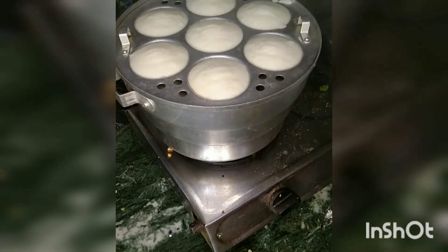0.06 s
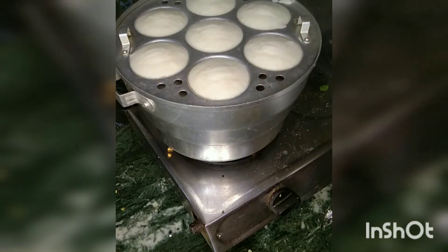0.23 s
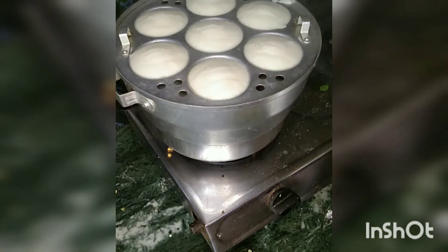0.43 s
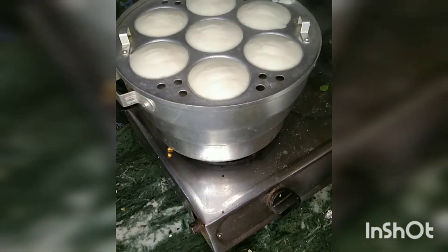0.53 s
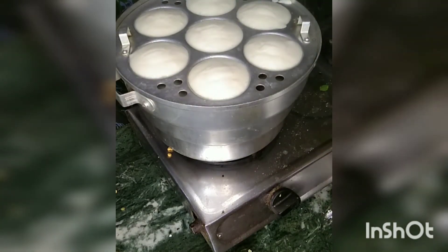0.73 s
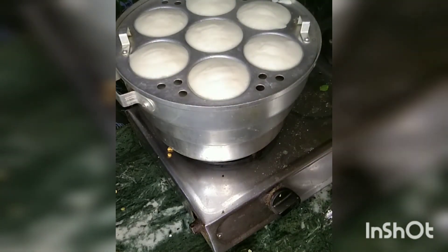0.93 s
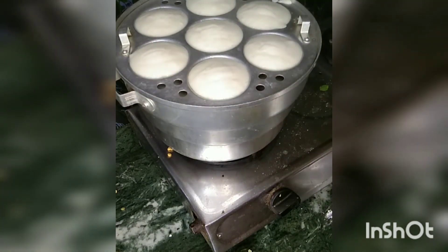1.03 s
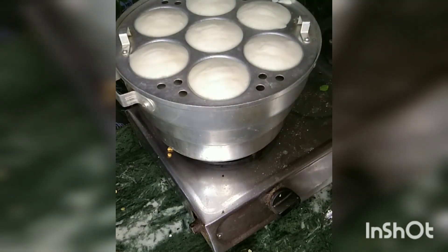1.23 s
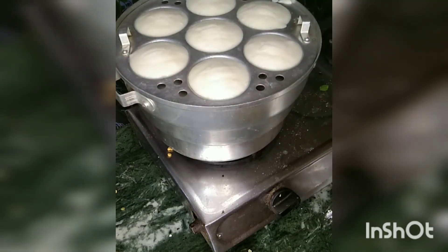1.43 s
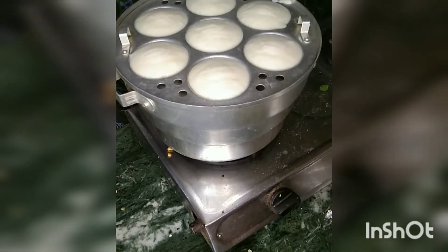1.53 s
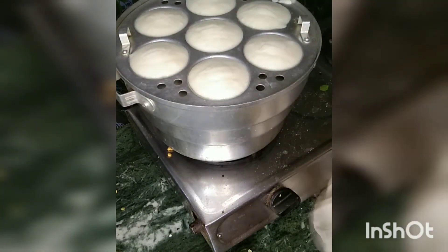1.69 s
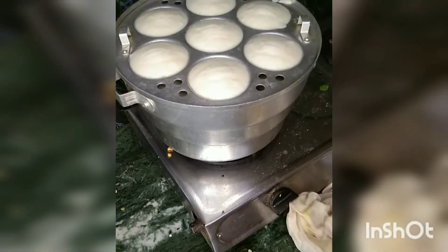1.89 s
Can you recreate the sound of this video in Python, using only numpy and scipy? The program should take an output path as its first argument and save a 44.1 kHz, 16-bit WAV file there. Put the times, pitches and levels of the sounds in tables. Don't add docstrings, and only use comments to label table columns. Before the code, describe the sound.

Metal cookware clattering in a home kitchen: ringing lid blows, a settling rattle, two tray knocks

```python
import sys
import numpy as np
from scipy import signal
from scipy.fft import rfft, irfft
from scipy.io import wavfile
from scipy.ndimage import uniform_filter1d

SR = 44100
rng = np.random.default_rng(int(sys.argv[2]) if len(sys.argv) > 2 else 0)


def to_linear_factor(level_db):
    exponent = np.asarray(level_db, float) / 20
    return 10 ** exponent


def inscribe(sig):
    pcm = np.round(np.clip(np.atleast_2d(sig).T, -1, 1) * 32767)
    wavfile.write(sys.argv[1], SR, pcm.astype(np.int16))


N = 85995

# start in seconds, rattle level in dB, rattle hold and 60 dB fade in seconds.
LID_BLOWS = [
    (0.2419, -17.5, 0.077, 0.14),
    (0.8686, -21, 0.074, 0.075),
]
# start in seconds, rattle in dB, hold and 60 dB fade in seconds.
CROWN_BLOWS = [
    (0.35, -16, 0.037, 0.29),
    (0.393, -21, 0.054, 0.23),
]
# start in seconds, rattle in dB, hold and 60 dB fade in seconds.
SETTLES = [
    (0.948, -21, .03, 0.13),
    (1.0215, -24.5, .01, 0.3),
]
# start in seconds, rattle in dB, hold and 60 dB fade in seconds.
TRAY_BLOWS = [
    (1.106, -21.5, 0.038, 0.11),
    (1.174, -33.5, 0.018, 0.16),
    (1.2461, -21.5, 0.0095, 0.22),
]
LID_HZ = [689, 974, 1428, 2212, 2776, 2870, 3135, 3409, 3550, 4156, 4962, 5504, 5805, 6598]
WALL_HZ = [230, 170, 482, 565, 3878, 4400, 4657, 6095, 7440, 8135, 8872, 9575, 10265]
TRAY_HZ = [392, 480, 775, 1025, 1085, 1529, 1615, 2272, 2471, 3136, 3650, 3994, 4580]


def evened(x):
    return x / np.sqrt(np.mean(x ** 2) + 1e-20)


def read(points, hz):
    f, value = np.transpose(points)
    return np.interp(np.log(hz + 1), np.log(f + 1), value)


def add(mix, s, sound):
    part = mix[round(s * SR):][:len(sound)]
    part += sound[:len(part)]


def decay(t, t60):
    return to_linear_factor(-60 * np.maximum(t, 0) / t60)


def onset(t, rise):
    return np.sin(np.pi / 2 * np.clip(t / rise, 0, 1)) ** 2


def slow(length):
    smooth = uniform_filter1d(rng.standard_normal(length), size=600)
    return evened(uniform_filter1d(smooth, size=600))


def wobble(length, db):
    return to_linear_factor(db * slow(length))


def shaped(gain):
    return evened(irfft(rfft(rng.standard_normal(N)) * gain, N))


def ring(modes, t, drift=0):
    out = 0
    for hz, t60, db in modes:
        wave = np.sin(2 * np.pi * (hz * t + drift + rng.random()))
        out = out + to_linear_factor(db) * np.sqrt(2) * decay(t, t60) * wave
    return out


def sheet(colour, clear_hz, count=500):
    clear_db, clear_t60, crowd_t60, spread_db = 11, 0.037, 0.086, 3.5
    t = np.arange(6000) / SR
    hz = np.geomspace(120, 15800, count) * rng.uniform(.99, 1.01, count)
    scatter_db = spread_db * rng.standard_normal(count) * np.minimum(hz / 3000, 1)
    size = to_linear_factor(read(colour, hz) + scatter_db) * np.sqrt(hz) * rng.choice([-1, 1], count)
    crowd = size @ np.sin(2 * np.pi * hz[:, None] * t) * decay(t, crowd_t60)
    clear = [(f, clear_t60, clear_db + read(colour, f) + 10 * np.log10(f)) for f in clear_hz if f > 900]
    out = (crowd + ring(clear, t)) * onset(t, 0.00034)
    return out / np.linalg.norm(out)


def clatter(blows, colour, clear_hz, crack_db):
    ticks_per_s, tick_spread_db, crack_t60 = 2500, 5.5, 0.012
    ticks, t = np.zeros(N), np.arange(SR // 2) / SR
    for s, db, hold, fade in blows:
        chance, side, size = rng.random((3, len(t)))
        shower = (chance < ticks_per_s / SR) * np.sign(side - .5)
        shower = shower * to_linear_factor(-tick_spread_db * np.log(size + 0.026))
        strength = decay(t - hold, fade) + to_linear_factor(crack_db) * decay(t, crack_t60)
        add(ticks, s, to_linear_factor(db) * evened(shower) * strength)
    return signal.oaconvolve(ticks, sheet(colour, clear_hz))[:N]


def lid_clatter():
    # frequency in Hz, level in dB per Hz.
    rim_colour = [(150, -34.5), (480, -0.5), (1000, 1), (1750, -11), (2300, -26), (2750, -6.5), (6000, -12),
                  (15500, -59.5)]
    # frequency in Hz, level in dB per Hz.
    crown_colour = [(150, -33.5), (300, -18.5), (500, -3), (1000, -1.5), (2000, -19.5), (3200, -7),
                    (6000, -12), (10000, -30.5), (15500, -45.5)]
    # frequency in Hz, level in dB per Hz.
    settle_colour = [(71, -46), (120, -19), (221, -15), (432, -2), (1300, -7.5), (1460, -7.5), (2590, -15),
                     (4860, -15.5), (15500, -62)]
    rim = clatter(LID_BLOWS, rim_colour, LID_HZ + WALL_HZ, crack_db=14.5)
    crown = clatter(CROWN_BLOWS, crown_colour, LID_HZ, crack_db=0)
    return rim + crown + clatter(SETTLES, settle_colour, LID_HZ[4::2], crack_db=-1)


def lid_ring():
    # t60 in seconds, level in dB on the rim,
    # the crown, letting go, the rim again.
    lid_modes = [(2.5, -35.5, -54.5, -40, -34), (0.53, -24, -28, -58.5, -54), (1.21, -24.5, -49, -20, -27),
                 (0.59, -39, -25.5, -36.5, -58), (0.36, -45, -36, -16.5, -50.5),
                 (0.62, -24, -29, -30, -21.5), (0.31, -22, -38.5, -43, -30.5), (0.38, -54, -44.5, -26, -41),
                 (0.45, -38.5, -35, -27.5, -42.5), (0.6, -37.5, -27, -31, -32),
                 (0.1, -33, -26.5, -46.5, -21), (0.47, -45, -51.5, -52.5, -44.5),
                 (0.071, -20.5, -18, -41.5, -14.5), (0.13, -39, -28, -46.5, -18.5),
                 (0.36, -42.5, -56.5, -36.5, -57), (0.3, -51.5, -55.5, -54.5, -69),
                  (0.62, -28, -31.5, -42.5, -25.5), (0.54, -26.5, -41.5, -42.5, -23),
                  (.15, -22.5, -38, -49.5, -24.5), (0.78, -23.5, -57, -50.5, -29.5),
                  (.27, -35, -46, -53.5, -50.5), (0.15, -45, -39.5, -58, -30.5),
                  (0.19, -46, -29.5, -48.5, -30), (0.41, -53, -39.5, -64.5, -51),
                  (0.33, -55.5, -42.5, -60, -44.5), (0.49, -52.5, -65, -66, -52.5),
                  (.25, -60, -45.5, -67, -46.5)]
    # start in seconds, rise in seconds, choked at seconds.
    rings = [
        (.243, 0.0068, 0.31),
        (.352, 0.0018, .868),
        (.405, .03, .868),
        (.869, .003, .948),
    ]
    choke_t60, wobble_db, drift_turns = .11, 2, .07
    steady_hz = LID_HZ[:3:2]
    out, t = np.zeros(N), np.arange(3 * SR // 4) / SR
    for k, (s, rise, choke) in enumerate(rings):
        for hz, m in zip(LID_HZ + WALL_HZ, lid_modes):
            shape = onset(t, rise) * decay(t + s - choke, choke_t60)
            shape = shape * wobble(len(t), wobble_db * (m[0] < .8))
            drift = drift_turns * (hz not in steady_hz) * slow(len(t))
            add(out, s, shape * ring([(hz, m[0], m[1 + k])], t, drift))
    return out


def tray_clatter():
    # frequency in Hz, level in dB per Hz.
    tray_colour = [(150, -41), (260, -11), (420, -3.5), (1500, -15.5), (2000, -24.5), (2500, -19),
                   (5500, -20.5), (15500, -65.5)]
    return clatter(TRAY_BLOWS, tray_colour, TRAY_HZ[:7], crack_db=6)


def tray_ring():
    # t60 in seconds, level in dB at the first knock, at the second knock.
    tray_modes = [(0.19, -18, -32), (0.045, -60, -40), (0.35, -37, -41.5), (0.096, -37, -31),
                  (0.21, -26, -31), (0.32, -28.5, -32.5), (0.35, -25, -64), (0.32, -34, -39),
                  (0.083, -28, -57), (0.5, -33.5, -54), (0.3, -37, -53), (0.1, -48, -31), (0.35, -63, -48)]
    wobble_db, drift_turns = 4, .2
    out, t = np.zeros(N), np.arange(SR // 2) / SR
    for k, blow in enumerate(TRAY_BLOWS[::2]):
        for hz, m in zip(TRAY_HZ, tray_modes):
            shape = onset(t, 0.0025) * wobble(len(t), wobble_db)
            add(out, blow[0], shape * ring([(hz, m[0], m[1 + k])], t, drift_turns * slow(len(t))))
    return out


def thumps():
    # start in seconds, pitch in Hz, level in dB, t60 in seconds.
    air_thumps = [(0.2432, 485, -2, 0.03), (0.353, 510, -5, 0.035), (.869, 510, -3, 0.04),
                  (1.2465, 495, -4, 0.035), (.950, 640, -5, 0.019), (.261, 700, -9, 0.03),
                  (.285, 750, -13, .03), (.304, 950, -14, .03), (.41, 500, -15, .04),
                  (0.887, 520, -8, 0.024), (.906, 490, -11, .03), (0.963, 300.5, -26, 0.12),
                  (1.022, 433, -19, .03), (1.086, 520, -22, .03), (1.1052, 442, -2, 0.026),
                  (1.122, 421, -7, 0.033), (1.136, 450, -13, .03), (1.264, 465, -10, 0.025)]
    out, t = np.zeros(N), np.arange(SR // 4) / SR
    for s, hz, db, t60 in air_thumps:
        shape = np.minimum(t / 0.0026, 1) * decay(t, t60)
        add(out, s, to_linear_factor(db) * shape * np.sin(2 * np.pi * hz * t))
    return out


def boom():
    boom_db = [-37.5, -35.5, -34.5, -32.5, -41, -34.5, -40, -33]
    boom_hz, boom_t60, rise_s = 91.9, 0.79, 0.045
    out, t = np.zeros(N), np.arange(SR) / SR
    starts = sorted(b[0] for b in LID_BLOWS + CROWN_BLOWS[:1] + SETTLES + TRAY_BLOWS)
    for s, stop, db in zip(starts, starts[1:] + [9], boom_db):
        shape = np.minimum(t / rise_s, 1) * decay(t + s - stop, 0.12)
        add(out, s, shape * ring([(boom_hz, boom_t60, db)], t))
    return out


def room(x):
    # frequency in Hz, t60 in seconds.
    room_t60 = [(150, 0.67), (500, 0.56), (2000, 0.64), (6000, 0.56), (14000, 0.5)]
    taps = np.zeros(SR)
    at = np.arange(200, SR - 20, 20)
    taps[at + rng.integers(0, 20, len(at))] = rng.choice([-1., 1.], len(at))
    hz, t, z = signal.stft(taps, SR, nperseg=256)
    fade = to_linear_factor(-60 * t / read(room_t60, hz)[:, None])
    tail = signal.istft(z * fade, SR, nperseg=256)[1]
    return signal.fftconvolve(x, tail / np.linalg.norm(tail))[:N]


def whistle():
    # time in seconds, level in dB.
    note_level = [(1.697, -53), (1.714, -52.5), (1.786, -49.5), (1.814, -43.5), (1.85, -53.5),
                  (1.95, -51.5)]
    pitch_hz, sag_hz_per_s, spread_hz, clean = 4035, 170, 90, .75
    t, (s, db) = np.arange(N) / SR, np.transpose(note_level)
    f = np.fft.rfftfreq(N, 1 / SR)
    turn = np.exp(2j * np.pi * np.cumsum(pitch_hz - sag_hz_per_s * (t - s[0])) / SR)
    band = 1 / (1 + (2 * f / spread_hz) ** 4)
    blur = (shaped(band) + 1j * shaped(band)) / np.sqrt(2)
    note = np.sqrt(2) * (turn * (clean + np.sqrt(1 - clean ** 2) * blur)).real
    return to_linear_factor(np.interp(t, s, db)) * np.clip((t - s[0]) / 0.0056, 0, 1) * note


def birds():
    # start in seconds, length in seconds, pitch in Hz, spread in Hz, level in dB.
    chirps = [(-.05, .33, 5320, 1000, -52), (.145, .14, 6850, 260, -65), (1.25, .46, 5550, 1950, -49),
              (1.6, .15, 3150, 50, -74), (1.36, .24, 4650, 160, -65), (1.635, .09, 4020, 150, -68),
              (1.66, .13, 4600, 1200, -62), (1.61, .08, 2200, 70, -75), (-.05, .3, 6250, 700, -72),
              (.12, .15, 6200, 900, -63), (.195, .08, 6700, 300, -59), (.19, .08, 5350, 120, -62)]
    chirp_sag = [-40, 90, -32, 5, -8, 5, -28, -9, 5, 16, 40, 5]
    chirp_glide = [0, -2200, 0, 0, 0, 0, 0, 0, 0, 0, -14000, -3000]
    fade_s, flutter_db = .04, 1.6
    hz, t = np.fft.rfftfreq(N, 1 / SR), np.arange(N) / SR
    out = np.zeros(N)
    for (s, length, pitch_hz, spread_hz, db), sag_db, glide in zip(chirps, chirp_sag, chirp_glide):
        gate = np.clip(np.minimum(4 * (t - s), s + length - t) / fade_s, 0, 1) * to_linear_factor(sag_db * (t - s))
        flutter = evened(uniform_filter1d(rng.standard_normal(N), 400))
        band = 1 / (1 + (2 * hz / spread_hz) ** 10)
        turn = 2 * np.pi * (pitch_hz + glide * (t - s) / 2) * (t - s)
        chirp = shaped(band) * np.cos(turn) + shaped(band) * np.cos(turn + np.pi / 2)
        out += to_linear_factor(db + flutter_db * flutter) * gate * chirp
    return out


def rustle():
    start_s, length_s, level_db, dull_hz = 1.697, 0.021, -58.5, 6400
    hz, t = np.fft.rfftfreq(N, 1 / SR), np.arange(N) / SR
    swell = np.maximum(t - start_s, 0) / length_s
    swell = swell * np.exp(1 - swell ** 0.91)
    tone = 1 / (1 + (hz / dull_hz) ** 2) / (1 + (hz / 11000) ** 4)
    return to_linear_factor(level_db) * swell * shaped(tone)


def hush():
    # frequency in Hz, level in dB per Hz.
    hush_colour = [(50, -1), (100, 1.5), (380, -10.5), (700, -13), (1500, -18.5), (1900, -30), (6500, -34),
                   (9500, -53)]
    hum_hz, hum_spread_hz = 384.8, 6.7
    hz = np.fft.rfftfreq(N, 1 / SR)
    hum = shaped(1 / (1 + (2 * (hz - hum_hz) / hum_spread_hz) ** 2))
    return to_linear_factor(-56) * shaped(to_linear_factor(read(hush_colour, hz))) + to_linear_factor(-64) * hum


def scene():
    knocks = lid_clatter() + tray_clatter() + thumps()
    rings = lid_ring() + tray_ring()
    echoes = room(to_linear_factor(-12.5) * knocks + to_linear_factor(-14) * rings)
    outside = whistle() + birds() + rustle() + hush()
    return (knocks + rings + echoes + boom() + outside)[None]


def top_cut(x):
    return signal.sosfilt(signal.butter(12, 16270, fs=SR, output="sos"), x)


def record(dry):
    low_cut_hz, limit, edge_hz = 69, 0.8, 15900
    cut = signal.sosfilt(signal.butter(4, low_cut_hz, "high", fs=SR, output="sos"), dry)
    limited = limit * np.tanh(cut / limit)
    top = signal.firwin(255, edge_hz, window=("kaiser", 9), fs=SR)
    return top_cut(signal.oaconvolve(limited, top[None], "same"))


dry = scene()
out = record(dry)
inscribe(out)
```